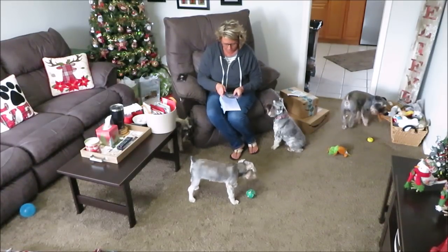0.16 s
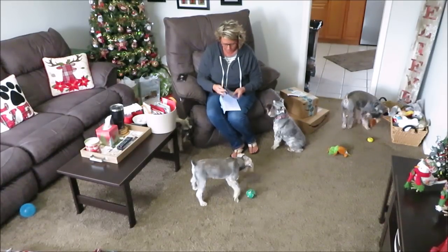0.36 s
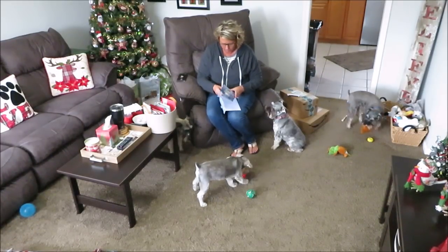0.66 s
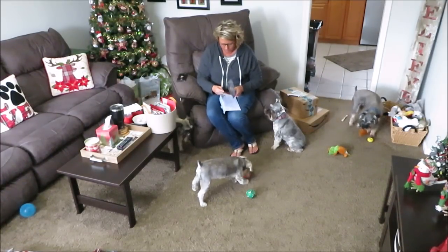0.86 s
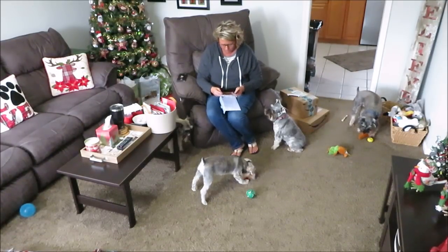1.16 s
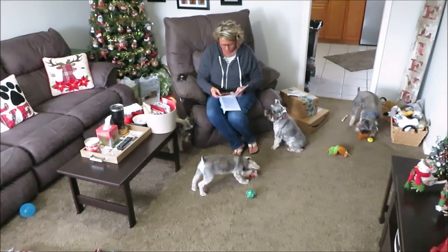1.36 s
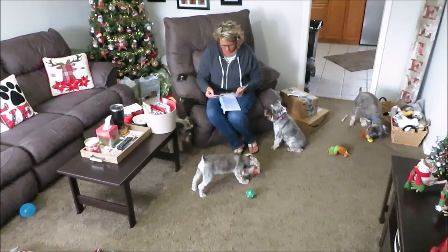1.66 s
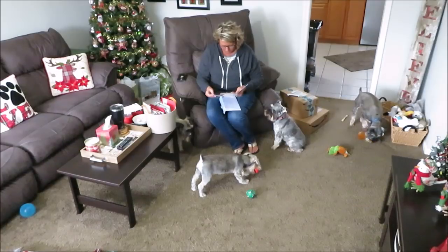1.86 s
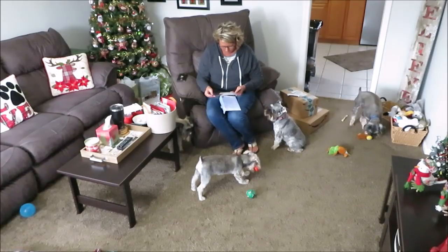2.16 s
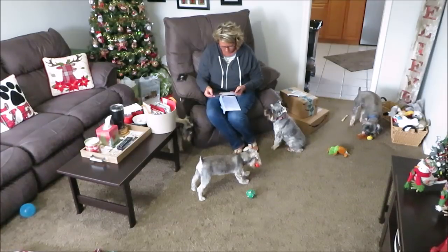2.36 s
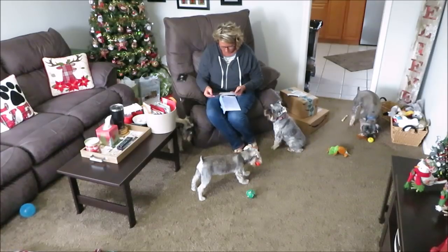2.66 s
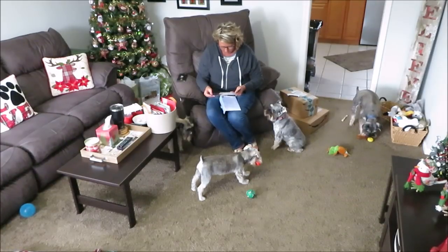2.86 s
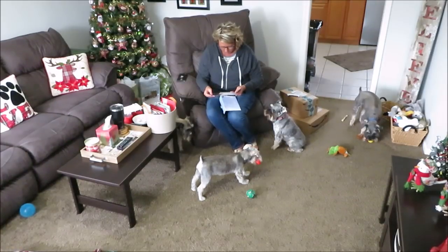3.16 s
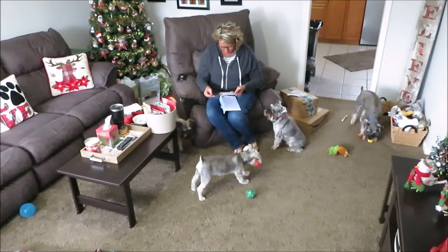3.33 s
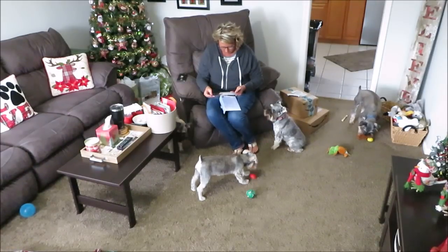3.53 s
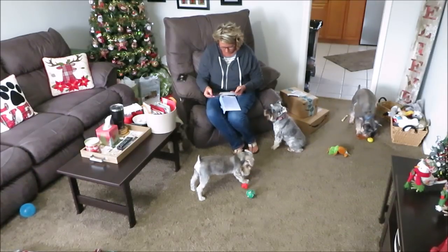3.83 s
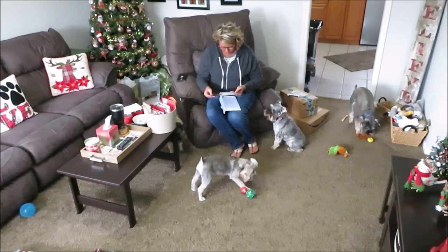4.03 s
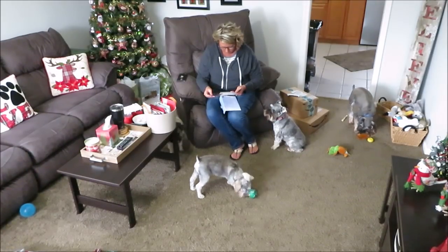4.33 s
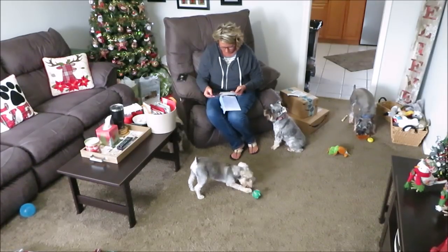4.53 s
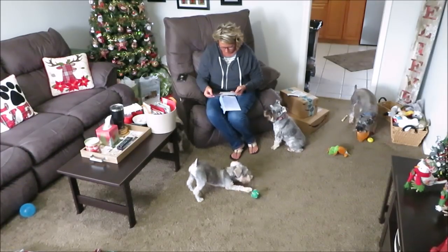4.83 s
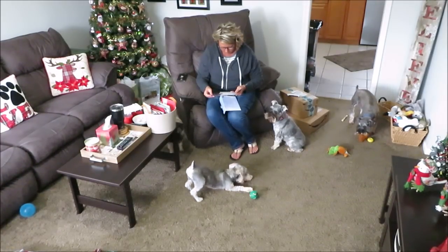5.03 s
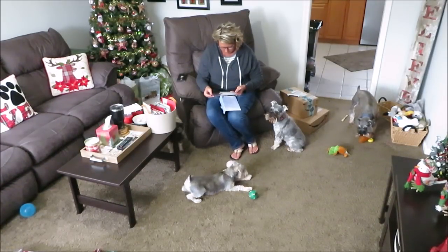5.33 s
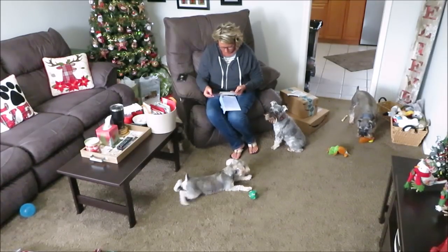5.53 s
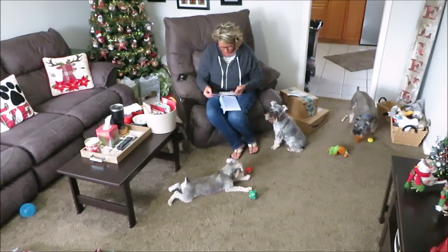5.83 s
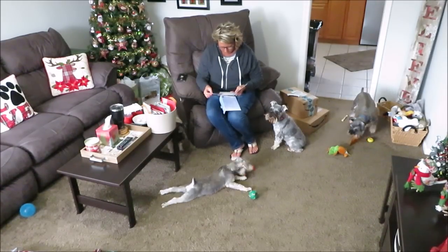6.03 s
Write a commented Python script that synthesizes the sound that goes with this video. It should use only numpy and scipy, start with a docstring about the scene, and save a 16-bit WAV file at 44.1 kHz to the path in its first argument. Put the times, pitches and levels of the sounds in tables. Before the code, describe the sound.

A small dog chews a squeaky rubber toy on living room carpet. A quick cluster of reedy squeaks opens, then a pause with a soft bump and clicks. More squeaks come in the middle, followed by a sharp click and another gap. Later squeaks mix with low paw thuds, then rougher, brighter wheezes before quiet bumps. The stereo pickup is a little distant, with short room echoes and a low steady rumble.

```python
"""A squeaky rubber toy, chewed by a small dog on the carpet of a quiet living room.
Every bite and release drives air through the toy's reed: a harmonic buzz, its pitch following the flow.
Now and then the air only whistles. Paws and toy thud and knock as ringing modes, teeth and claws click
as noise bursts, fur brushes the carpet as swelling noise. The room adds echoes and a low room tone."""
import sys
import numpy as np
from scipy import signal
from scipy.fft import rfft, irfft, next_fast_len
from scipy.io import wavfile
from scipy.ndimage import uniform_filter1d

SR = 44100
rng = np.random.default_rng(int(sys.argv[2]) if len(sys.argv) > 2 else 0)


def pcm_store(signal):
    """Save signal as 16-bit PCM."""
    levels = np.round(np.clip(np.atleast_2d(signal), -1, 1) * 32767)
    wavfile.write(sys.argv[1], SR, levels.astype(np.int16).T)


N = 272979
TIME_S = np.arange(N) / SR
CUTOFF_HZ = 15750

# Room tone spectrum. Each row: frequency in Hz, relative density in dB per Hz.
ROOM_TONE_COLOUR = [(12, -27), (20, 6), (76, -2), (113, -7.5), (167, -6.5), (308, -9.5), (407, -9.5),
                    (442, -9), (495, -11), (889, -15.5), (966, -16.5), (1790, -17), (2170, -18),
                    (6260, -26.5), (15700, -41)]
ROOM_TONE_DB = -56.5
# Width of the room tone. Each row: frequency in Hz, side minus mid in dB.
ROOM_TONE_SIDE = [(60, -25), (130, -6.5), (290, 1.5), (640, 0.5), (1410, -0.5), (3100, -2), (6820, -1.5),
                  (15000, -3.5)]
# Width of the echoes; close microphones keep all but the treble narrow.
# Each row: frequency in Hz, side minus mid in dB.
ECHO_SIDE = [(100, -35), (1000, -18.5), (2000, -25), (4000, -7.5), (8000, -1.5), (13000, 4.5)]
# Width of the direct sound. Each row: frequency in Hz, side minus mid in dB.
DIRECT_SIDE = [(1000, -28.5), (4000, -14.5), (8000, -12), (12000, -2.5)]
# Decay of the late echoes. Each row: frequency in Hz, t60 in seconds.
ROOM_T60 = [(100, 0.75), (1000, 0.43), (3000, 0.46), (6000, 0.3), (14000, 0.4)]
# Strength of the echoes. Each row: frequency in Hz, level in dB relative to the sound fed in.
ROOM_LEVEL = [(100, -3), (1000, -7), (2500, -5), (5500, -4), (9000, -9), (15000, -5.5)]

# Fur and toy brushing the carpet. Each row: middle in seconds, half length in seconds, level in dB.
BRUSH_STROKES = [(1.434, 0.0086, -41.5), (3.65, 0.0089, -52), (4.19, 0.036, -68), (4.432, 0.015, -55),
                 (5.963, .022, -61), (6.095, 0.049, -58)]
# Carpet spectrum. Each row: frequency in Hz, relative level in dB.
BRUSH_COLOUR = [(150, 11), (500, 1), (1400, 8), (2400, -2), (3500, -5), (8000, -26), (15000, -26)]
# Teeth and claws. Each row: start in seconds, level in dB before colouring.
CLICKS = [(.909, -36.5), (1.188, -53), (1.423, -32), (1.427, -31), (2.4163, -32), (2.4188, -23.5),
          (2.4305, -41), (3.615, -38), (3.633, -34), (4.2367, -41.5), (4.79, -49), (5.956, -63),
          (6.055, -61)]
# Click spectrum. Each row: frequency in Hz, gain in dB.
CLICK_COLOUR = [(500, -18), (1400, -17), (1950, 2), (3300, 6.5), (4200, -9.5), (5600, -1), (7300, -16.5),
                (9000, -6.5), (11500, -12.5), (15000, -23)]
# Paws and toy landing. Each row: start in seconds, relative floor thud in dB, relative hollow knock in dB.
BUMPS = [(0.824, -39.5, -77), (1.421, -40, -31.5), (1.434, -50, -37.5), (1.468, -58, -44),
         (1.885, -70, -49.5), (2.049, -43, -52.5), (2.44, -45, -70), (3.635, -66, -44.5),
         (3.699, -38.5, -56), (4.146, -34.5, -54), (4.181, -34, -52.5), (4.443, -60, -52),
         (4.851, -65, -53), (5.166, -65, -52), (5.746, -49, -58), (6.108, -44.5, -57)]
# Floor resonances. Each row: nominal frequency in Hz, mean level in dB, t60 in seconds.
FLOOR_MODES = [(58.7, 2, 0.066), (84, -1, 0.11), (111, -6.5, 0.063), (186, -13.5, 0.19)]
# Hollow toy resonances. Each row: nominal frequency in Hz, mean level in dB, t60 in seconds.
KNOCK_MODES = [(176, -6, 0.079), (198.6, -1, 0.19), (286, 1.5, 0.052), (334, -2, 0.14), (393, 2, 0.093),
               (467, 0, 0.051), (620, -12.5, 0.058), (840, -3, 0.029)]

# Air whistling back into the toy. Each row: time in seconds, pitch in Hz, level in dB.
WHISTLE = [(4.645, 7450, -100), (4.665, 7440, -53), (4.68, 7800, -78), (4.701, 7540, -82),
           (4.728, 7480, -56), (4.745, 7360, -76)]
# Bites and releases. Each row: start in seconds, length in seconds, time to the top in seconds,
# start, top and end pitch in Hz before smoothing, arch shape (1 round, 2 bell), relative level at the top in dB,
# extra fundamental in dB, extra treble in dB, rasp from 0 to 1, direct sound against room in dB,
# then the gain of each of the three cavities in dB.
SQUEAKS = [ (0.0, 0.066, .003, 1156, 1144, 970, 0.93, -35, -3, 5, 0.16, -3, -1, -4, -1.5),
           (0.1, 0.047, 0.0038, 1027, 1012, 913, 1.37, -43, -5.5, 4.5, 0.69, -0.5, -11.5, -14, -6.5),
           (0.292, .058, 0.03, 960, 1003, 1001, 1.6, -39, -9, 3, 0.28, -7, -9.5, -20, -5),
           (0.354, 0.11, .055, 1027, 1354, 1050, 2.5, -35, -0.5, 3, 0.62, -5, -3.5, -19, 3.5),
           (0.47, .13, 0.074, 1102, 1269, 1019, 2.43, -32.5, -0.5, 11, 0.38, -8, -1, -5, -7),
           (0.64, 0.091, 0.035, 1155, 1592, 1240, 1.16, -32.5, 7, 7.5, 0.46, -2, -0.5, -21, -0.5),
           (0.735, 0.091, 0.0053, 1190, 1183, 918, 1.17, -41.5, -0.5, 5.5, 0.9, -5, -6, -14, 3.5),
           (1.421, 0.043, 0.0028, 1374, 1377, 927, 1.52, -36.5, 2, 5.5, .85, -1, -10, -0.5, -6.5),
           (1.51, 0.085, 0.023, 950, 996, 925, 1.8, -47.5, 4, -1.5, 0.27, 0.5, -9, -24, 8),
           (1.61, 0.056, 0.04, 1083, 1119, 1040, 1, -41, 1, -2, 0.27, -7.5, -5, -2, 10.5),
           (1.882, 0.045, 0.0049, 980, 960, 912, 1.25, -52, 1.5, 15, 0.66, -2, 2, -18, -6.5),
           (1.95, 0.053, 0.026, 923, 997, 950, 1.17, -49, 2.5, 3, 0.35, -1.5, 4.5, -4, 5),
           (2.023, 0.11, 0.078, 1098, 1258, 1039, 1.94, -33.5, -8, 1, 0.17, -3.5, 0, 12, 6.5),
           (2.164, 0.11, 0.0044, 977, 958.5, 868, 0.26, -43, -1.5, -1, .05, -2, -1, -2.5, 4.5),
           (3.258, 0.058, 0.022, 1074, 1157, 920, 0.75, -36, -3, 3.5, 0.2, -4, -3.5, 5.5, -0.5),
           (3.452, 0.021, .004, 942, 950, 910, 0.64, -46.5, -6.5, -11.5, 0.37, -4, -5.5, 0, 8.5),
           (3.631, 0.07, 0.0103, 1102, 1300, 1026, 1.77, -38.5, -4.5, -8.5, 0.99, -1.5, -1.5, 0, 12.5),
           (3.697, 0.0283, .004, 967, 969, 916, 1, -44.5, 4, -1.5, 0.35, -2, -6, -2, 7),
           (4.498, 0.068, 0.055, 1078, 1115, 1000, 1.17, -38.5, -3, -19.5, 0.26, 0.5, 4.5, 10.5, 9.5),
           (4.841, 0.058, 0.0122, 1278, 1273, 1041, 0.86, -49, 10.5, 17.5, 0.99, -2.5, 4.5, -4, -9.5),
           (4.907, 0.11, 0.037, 1038, 1186, 969, 1.3, -43.5, -1, 15, 0.67, -5, -2.5, 2, -9.5),
           (5.087, 0.14, 0.074, 920, 1104, 909, 0.84, -41, -1.5, -2, 0.47, -3, -8.5, -9, 0.5),
           (5.263, 0.083, 0.0066, 1101, 1111, 999, 3.4, -43, 0, 23.5, 0.37, -2, -3.5, -11, -20),
           (5.569, 0.034, 0.026, 1440, 1643, 1606, 0.97, -40.5, 6, 22.5, 0.91, -2, -6.5, -17, -23),
           (5.624, .088, 0.0028, 1266, 1264, 938, 1.34, -43.5, 5.5, 21, 0.65, -5.5, 2, -15.5, -11.5), ]
# Reed and rubber shell. Each row: frequency in Hz, gain in dB.
TOY_COLOUR = [(900, 3.5), (1500, -1.5), (1850, 1), (2400, 1.5), (2900, 1), (3600, -0.5), (4400, -1.5),
              (5100, -7), (5700, -7), (6800, -15), (9000, -13.5), (11500, -21.5), (15000, -37)]
# Nozzle and mouth, the last one open to the top. Each row: centre in Hz, gaussian half width in Hz.
CAVITIES = [(3500, 700), (5800, 610), (9500, 2700)]
# Buzz fading and treble dulling as the flow sags, per octave of pitch below the top
FADE_DB_PER_OCTAVE, DULLING_DB_PER_OCTAVE = 20.5, 6.5
REED_ATTACK_S = 0.0028
WAVER_DB, WAVER_PER_S = 2.5, 86  # small random wavering of each squeak's loudness
BUILD_UP_DB, BUILD_UP_S = 1, 0.027  # flow builds up
RUN_OUT_DB_PER_S = 20  # air runs out past the top


def from_db(db):
    """Decibels to gain."""
    return 10 ** (np.asarray(db) / 20)


def rms_one(x):
    """Scale to unit rms."""
    return x / np.sqrt(np.mean(x ** 2) + 1e-20)


def at_hz(points, hz):
    """Read a table on a log-frequency axis."""
    knots_hz, values = np.transpose(points)
    return np.interp(np.log(np.maximum(hz, 1)), np.log(knots_hz), values)


def coloured(x, spectrum):
    """Filter by a table of frequency in Hz and gain in dB."""
    length = x.shape[-1]
    size = next_fast_len(length + 2048)
    gain = from_db(at_hz(spectrum, np.fft.rfftfreq(size, 1 / SR)))
    return irfft(rfft(x, size) * gain, size)[..., :length]


def drift(rate_per_s, length):
    """Random line through unit-normal knots, `rate_per_s` knots a second."""
    knots = rng.standard_normal(4096)
    return np.interp(np.arange(length) * rate_per_s / SR, np.arange(len(knots)), knots)


def stereo(mid, side):
    """Mid and side to left and right."""
    return np.array([mid + side, mid - side])


def add(track, start_s, sound):
    """Mix a sound in at a time in seconds."""
    start = max(round(start_s * SR), 0)
    track[start:start + len(sound)] += sound[:max(N - start, 0)]


def room_tone():
    """Steady low rumble and faint hiss of the house: stationary coloured noise."""
    mid, side = coloured(rng.standard_normal((2, N)), ROOM_TONE_COLOUR)
    side = coloured(rms_one(side), ROOM_TONE_SIDE)
    return from_db(ROOM_TONE_DB) * stereo(rms_one(mid), side)


def living_room(x, build_up_s=0.02, first_echo_s=0.004, early_db=6, early_t60_s=0.14):
    """Separate echoes off the furniture thicken into a tail; each band has its own decay."""
    t = TIME_S[:SR * 3 // 5]
    density = np.clip(0.022 + (t / build_up_s) ** 2 / 10, 0, 1)
    present = rng.random((2, len(t))) < density
    echoes = rng.standard_normal((2, len(t))) * present / np.sqrt(density) * (t > first_echo_s)
    spectrum = rfft(echoes)
    hz = np.fft.rfftfreq(len(t), 1 / SR)
    centres_hz = np.geomspace(100, 14000, 8)
    response = 0
    for centre_hz, share in zip(centres_hz, np.eye(len(centres_hz))):
        band = irfft(spectrum * at_hz(np.c_[centres_hz, share], hz), len(t))
        late = from_db(-60 * t / at_hz(ROOM_T60, centre_hz))
        decay = late + from_db(early_db - 60 * t / early_t60_s)
        response = response + band * decay / np.sqrt(np.sum(decay[t > first_echo_s] ** 2))
    response = coloured(response, ROOM_LEVEL)
    mid, side = signal.fftconvolve(x[None], response, axes=1)[:, :N]
    return stereo(mid, coloured(side, ECHO_SIDE))


def brushing():
    """Carpet fibres catch and slip under the dog: grainy noise; each stroke swells and fades."""
    strokes = np.zeros(N)
    for middle_s, half_s, level_db in BRUSH_STROKES:
        strokes += from_db(level_db) * np.exp(-0.5 * ((TIME_S - middle_s) / half_s) ** 2)
    grains = rng.standard_normal(N) * from_db(4.5 * drift(150, N))
    return strokes * rms_one(coloured(grains, BRUSH_COLOUR))


def clicks(crack_t60_s=0.01, rattle_db=-17, rattle_t60_s=0.16):
    """A sharp crack of noise with a short rattle after it."""
    out = np.zeros(N)
    t = TIME_S[:SR // 8]
    decay = from_db(-60 * t / crack_t60_s) + from_db(rattle_db - 60 * t / rattle_t60_s)
    for start_s, level_db in CLICKS:
        add(out, start_s, from_db(level_db) * decay * rng.standard_normal(len(t)))
    return coloured(out, CLICK_COLOUR)


def struck(modes, contact_s, scuff=0.2, scuff_t60_s=0.12, scuffs_per_s=900):
    """A soft contact and the scuffing after it set the modes ringing, each time a little differently."""
    t = TIME_S[:SR // 3]
    strength_db = rng.normal(0, 1.5, len(modes))
    detune = rng.normal(1, 0.03, len(modes))
    rings = np.zeros(len(t))
    for k, (hz, db, t60_s) in enumerate(modes):
        decay = from_db(db + strength_db[k] - 60 * t / t60_s)
        rings += (-1) ** k * decay * np.sin(2 * np.pi * hz * detune[k] * t)
    grains = rng.standard_normal(len(t)) * (rng.random(len(t)) < scuffs_per_s / SR)
    force = scuff * grains * from_db(-60 * t / scuff_t60_s)
    force[0] = 1  # the contact itself
    return signal.fftconvolve(force, rings * (1 - np.exp(-t / contact_s)))[:len(t)]


def bumps(thud_db=2.0, knock_db=-3.0):
    """Each landing shakes the floor and knocks on the hollow toy."""
    out = np.zeros(N)
    for start_s, floor_db, hollow_db in BUMPS:
        add(out, start_s, from_db(floor_db + thud_db) * struck(FLOOR_MODES, contact_s=0.0062))
        add(out, start_s, from_db(hollow_db + knock_db) * struck(KNOCK_MODES, contact_s=0.00041))
    return out


def whistle():
    """Too little air to start the reed: one thin tone."""
    time_s, pitch_hz, level_db = np.transpose(WHISTLE)
    gain = np.interp(TIME_S, time_s, from_db(level_db), left=0, right=0)
    phase = 2 * np.pi * np.cumsum(np.interp(TIME_S, time_s, pitch_hz)) / SR
    return gain * np.sin(phase)


def air_flow(length_s, top_s, start_hz, top_hz, end_hz, shape, t):
    """The reed's pitch in Hz through one puff: a smoothed arch to the top and down again."""
    top_s = np.clip(top_s, 0.001, 0.95 * length_s)
    progress = np.interp(t, [0, top_s, length_s], [0, 1, 0])
    arch = np.sin(np.pi / 2 * progress) ** abs(shape)
    foot_hz = np.where(t < top_s, start_hz, end_hz)
    return uniform_filter1d(foot_hz + (top_hz - foot_hz) * arch, size=300)


def toy_gain_db(hz, treble_db, cavity_db, treble_from_hz=3000):
    """The shell, a treble shelf that follows the air flow, and the cavities the jaws open or cover."""
    cavities_db = 0
    cavity_hz = np.minimum(hz, CAVITIES[-1][0])
    for db, (centre_hz, width_hz) in zip(cavity_db, CAVITIES):
        cavities_db = cavities_db + db * np.exp(-0.5 * ((cavity_hz - centre_hz) / width_hz) ** 2)
    shelf_db = treble_db * np.clip(np.log2(hz / treble_from_hz), 0, 1)
    return at_hz(TOY_COLOUR, hz) + shelf_db + cavities_db


def reed_buzz(pitch_hz, phase, treble_db, pure_db, rasp, cavity_db, dispersion_rad=0.476, flutter_db=6):
    """The reed chops the air into harmonics, which flutter when overblown."""
    buzz = np.zeros(len(phase))
    for k in range(1, int(CUTOFF_HZ / pitch_hz.min()) + 1):
        partial_hz = k * pitch_hz
        partial_db = toy_gain_db(partial_hz, treble_db, cavity_db) + pure_db * (k == 1)
        partial_db = partial_db + flutter_db * rasp * drift(301.5, len(phase))
        lag = dispersion_rad * k ** 2  # the shell delays high partials more, smearing each puff
        audible = partial_hz < SR / 2
        buzz += np.sqrt(2) * from_db(partial_db) * np.cos(k * phase - lag) * audible
    return buzz


def escaping_air(phase, treble_db, cavity_db):
    """Turbulence hisses through the same cavities each time the reed opens."""
    hz = np.geomspace(500, CUTOFF_HZ, num=60)
    air = rng.standard_normal(SR // 4)[:len(phase)] * (1 + np.cos(phase))
    air = coloured(air, np.c_[hz, toy_gain_db(hz, treble_db.mean(), cavity_db)])
    return signal.sosfilt(signal.butter(2, 1500, "high", fs=SR, output="sos"), air)


def squeak(gesture, level_top_db, pure_db, bright_db, rasp, cavity_db):
    """One puff: level and treble follow the flow; a hard bite overblows the reed into flutter and hiss."""
    lead_s, release_s, jitter, air_db = 0.0022, 0.0064, 0.021, -12
    length_s, top_s = gesture[:2]
    t = np.arange(-lead_s, length_s + release_s, 1 / SR)
    pitch_hz = air_flow(*gesture, t)
    sag_octaves = np.log2(pitch_hz.max() / pitch_hz)
    level_db = level_top_db - FADE_DB_PER_OCTAVE * sag_octaves + WAVER_DB * drift(WAVER_PER_S, len(t))
    level_db = level_db - BUILD_UP_DB * np.exp(-(t - t[0]) / BUILD_UP_S)
    level_db = level_db - RUN_OUT_DB_PER_S * np.maximum(t - top_s, 0)
    treble_db = bright_db - DULLING_DB_PER_OCTAVE * sag_octaves
    pitch_hz = pitch_hz * (1 + jitter * rasp * drift(592.0, len(t)))
    phase = 2 * np.pi * np.cumsum(pitch_hz) / SR
    buzz = reed_buzz(pitch_hz, phase, treble_db, pure_db, rasp, cavity_db)
    air = escaping_air(phase, treble_db, cavity_db) * np.sqrt(SR / 2 / pitch_hz)
    gate = np.clip((t - t[0]) / REED_ATTACK_S, 0, 1) * np.clip((t[-1] - t) / release_s, 0, 1)
    return t[0], from_db(level_db) * gate * (buzz + rasp * from_db(air_db) * air)


def toy(level_db=-1.0):
    """With the nozzle pointing away, less comes straight to the microphones and more goes into the room."""
    straight, scattered = np.zeros((2, N))
    for start_s, *row in SQUEAKS:
        gesture = row[:6]
        level_top_db, pure_db, bright_db, rasp, facing_db, *cavity_db = row[6:]
        rasp = np.clip(rasp, 0, 1)
        offset_s, sound = squeak(gesture, level_top_db, pure_db, bright_db, rasp, cavity_db)
        add(straight, start_s + offset_s, sound * from_db(level_db + facing_db / 2))
        add(scattered, start_s + offset_s, sound * from_db(level_db - facing_db / 2))
    return straight, scattered


def scene():
    """The dog plays in front of the microphones, with the room around it."""
    straight, scattered = toy()
    handling = whistle() + bumps() + clicks() + brushing()
    dog = straight + handling
    # Quadrature side: equally loud in both channels, out of step in the treble
    quadrature = signal.hilbert(dog, next_fast_len(N)).imag[:N]
    direct = stereo(dog, coloured(quadrature, DIRECT_SIDE))
    echoes = living_room(scattered + handling)
    balance = from_db([[-0.2], [0.2]])  # left, right
    return (direct + echoes) * balance + room_tone()


def record(dry):
    """The deepest rumble and the top are cut steeply."""
    dry = signal.sosfilt(signal.butter(4, 28, "high", fs=SR, output="sos"), dry)
    return signal.sosfilt(signal.ellip(12, 0.1, 80, CUTOFF_HZ, fs=SR, output="sos"), dry)


dry = scene()
out = record(dry)
pcm_store(out)
```